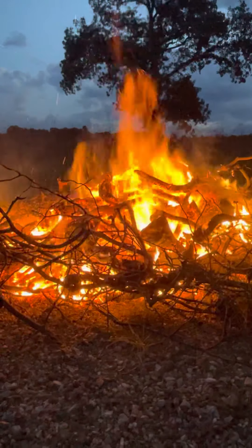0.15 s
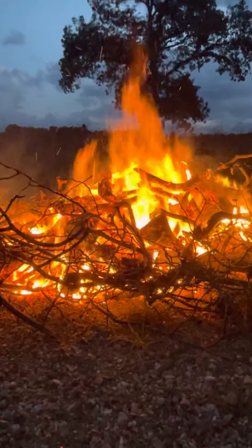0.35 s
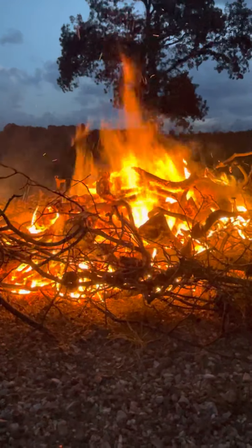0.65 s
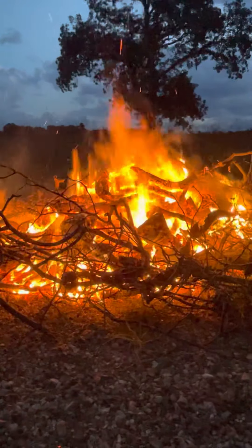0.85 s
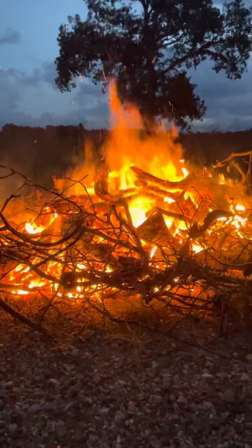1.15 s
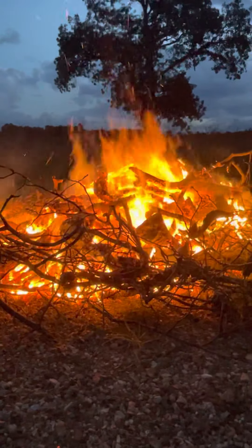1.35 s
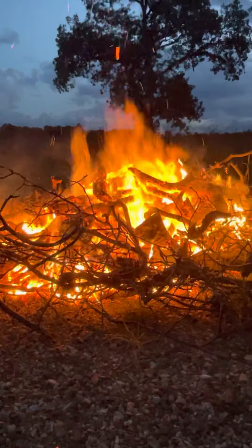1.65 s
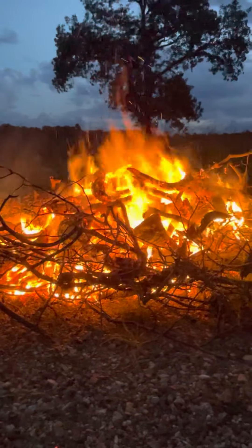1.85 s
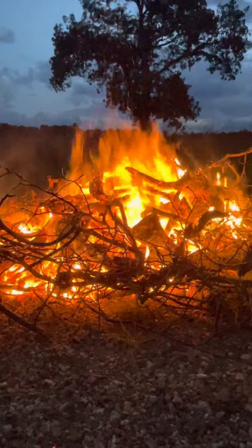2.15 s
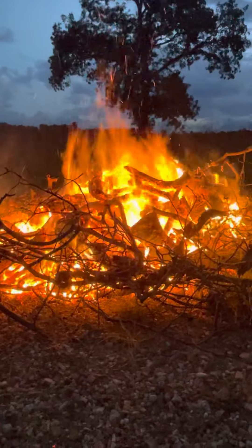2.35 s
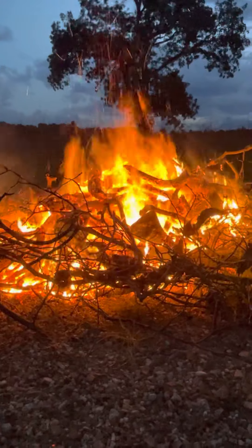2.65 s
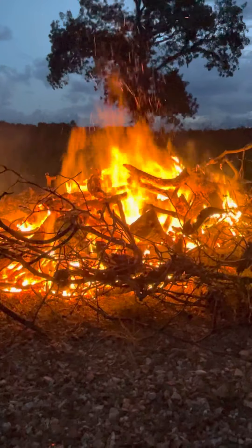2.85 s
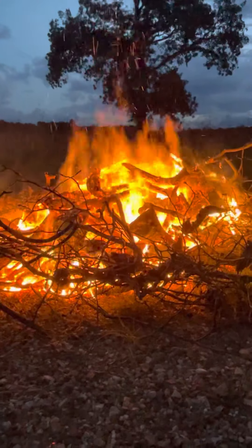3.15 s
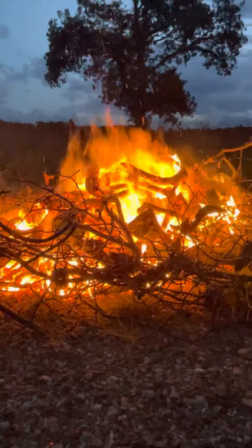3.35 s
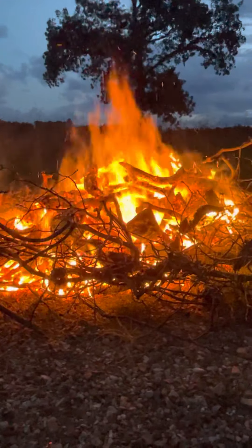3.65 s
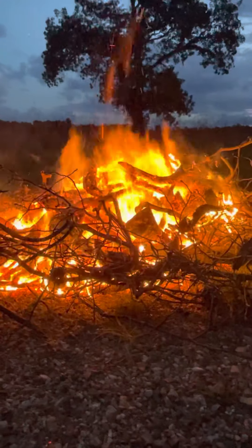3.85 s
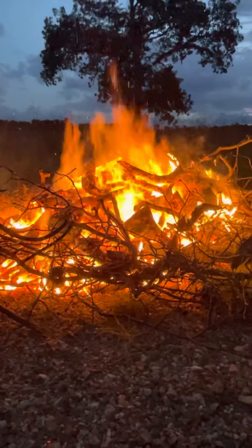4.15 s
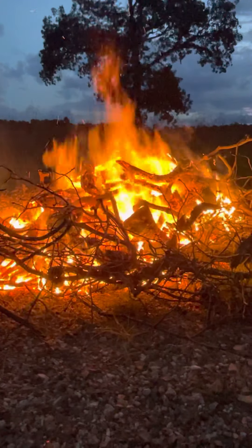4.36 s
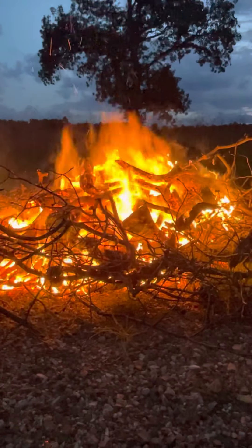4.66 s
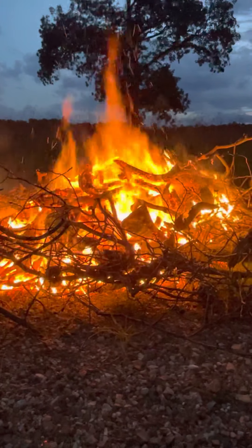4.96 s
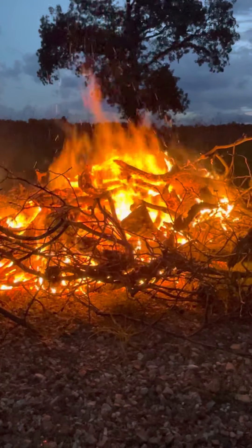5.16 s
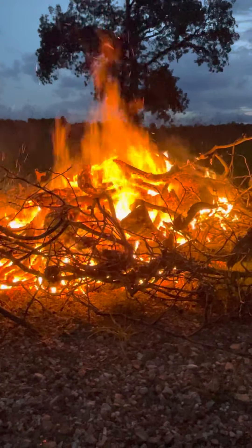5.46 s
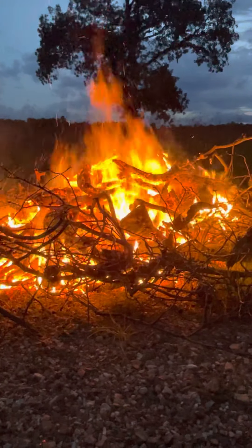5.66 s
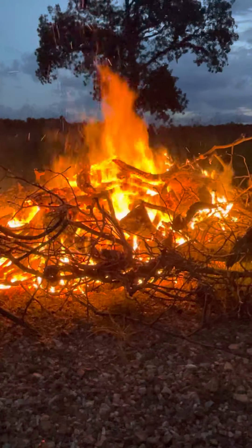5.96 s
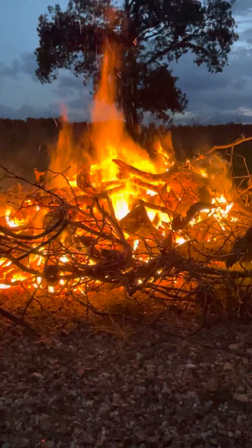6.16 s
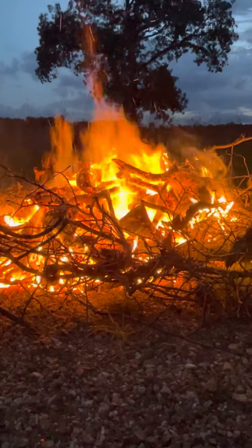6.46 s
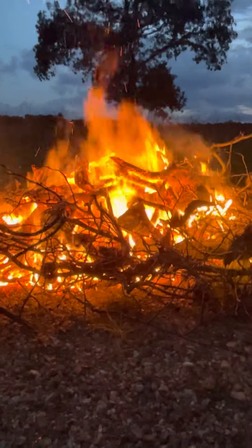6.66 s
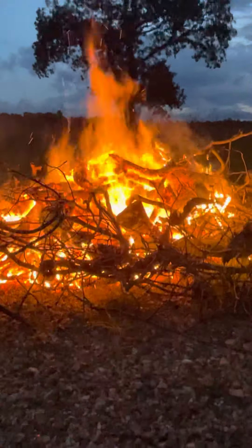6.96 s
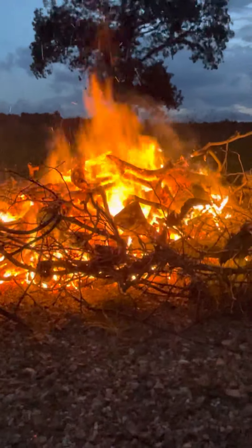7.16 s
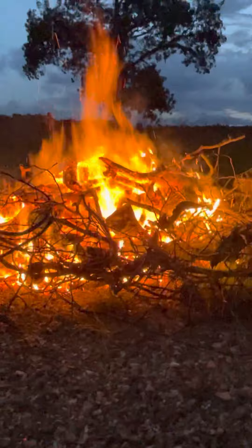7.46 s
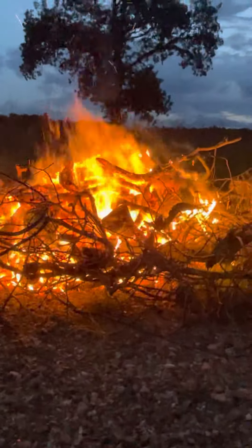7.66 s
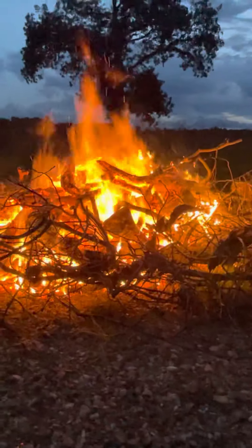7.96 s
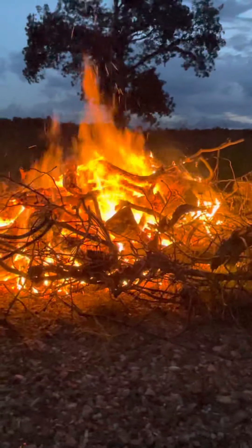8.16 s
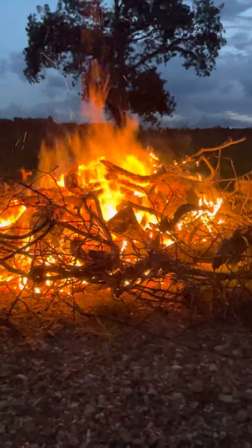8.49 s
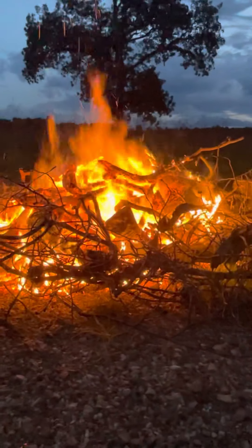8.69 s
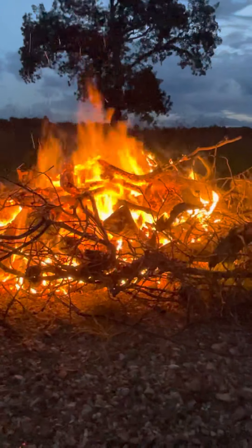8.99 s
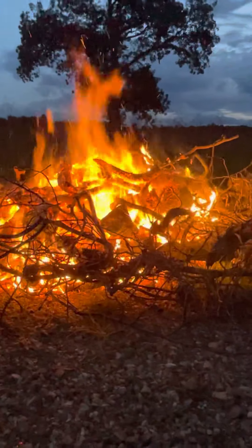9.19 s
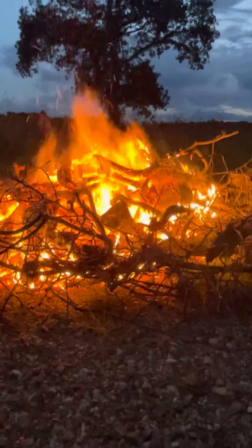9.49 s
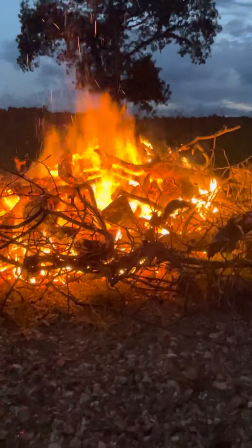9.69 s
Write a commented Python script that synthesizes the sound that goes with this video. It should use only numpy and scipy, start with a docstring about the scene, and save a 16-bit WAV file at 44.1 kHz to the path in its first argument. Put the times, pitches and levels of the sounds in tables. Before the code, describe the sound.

Burning branches pop and crackle close by in the open, growing fiercer toward the end, with faint dusk insects and one distant calf low.

```python
"""A pasture at dusk: a big brush fire burns a few metres ahead, popping and crackling over its rumble and hiss.
Pops and crackles are sharp pulses with scattered noise echoes; the flames are coloured, partly shared noise.
Crickets chirp and trill in the grass as pulsed tones, with distant choruses as throbbing noise bands.
A calf lows once, far to the right, as a few overtones on an arched pitch."""
import sys
import numpy as np
from scipy import signal
from scipy.fft import rfft, irfft, next_fast_len
from scipy.io import wavfile
from scipy.ndimage import uniform_filter1d

SR = 44100
rng = np.random.default_rng(int(sys.argv[2]) if len(sys.argv) > 2 else 0)


def log_audio(samples):
    """Write samples as a 16-bit WAV file to the path given in sys.argv[1]."""
    # one column per channel
    frames = np.atleast_2d(samples).T
    # limit to full scale, then quantise
    limited = np.clip(frames, -1, 1)
    pcm = np.round(limited * 32767).astype(np.int16)
    wavfile.write(sys.argv[1], SR, pcm)


N = 433503
SIZE = next_fast_len(N + 8192)  # transform length, padded so filters do not wrap round
FREQ = np.maximum(np.arange(SIZE // 2 + 1) * SR / SIZE, 1)  # Hz
TIME = np.arange(N) / SR  # s


def undb(db):
    """Gain of a dB value."""
    return 10 ** (np.asarray(db) / 20)


def level(x, db):
    """Set the rms level in dB."""
    return x * undb(db) / np.sqrt(np.mean(x ** 2))


def read(table):
    """Read a (Hz, value) table at every frequency, straight between points on a log axis."""
    hz, value = np.transpose(table)
    return np.interp(np.log(FREQ), np.log(np.maximum(hz, 1)), value)


def shape(x, response):
    """Filter by a frequency response."""
    return irfft(rfft(x, SIZE) * response, SIZE)[..., :N]


def walk(rate):
    """Random drift: values held for 1 / rate seconds, then smoothed twice; spread near 1."""
    hold = int(SR / rate)
    steps = np.repeat(rng.standard_normal(N // hold + 1), hold)
    smooth = uniform_filter1d(uniform_filter1d(steps, hold), hold)
    return 1.71 * smooth[:N]


def pan(db):
    """Left and right gains for a left-minus-right difference in dB."""
    return undb(np.array([[db], [-db]]) / 2)


# Colour of the four parts of a burst. Each row: frequency in Hz, relative gain in dB.
THUD = [(100, -9), (280, -5), (500, 0.5), (1000, -8.5), (2000, -34.5)]
CRACK = [(600, -16.5), (1350, -1), (2400, 5), (3300, -3), (4500, -36)]
SNAP = [(2800, -23.5), (4000, 1), (7500, -5), (10000, -20)]
SIZZLE = [(6500, -19), (9000, 5), (16000, -4.5)]
# echoes off near branches, then off the whole pile
SCATTER_MS, SCATTER_DB, TAIL_MS = 0.33, -8.5, 7.5
RAGGED_DB = 5.5  # spread of the uneven steps in the tail
BURST_SAMPLES = 700


def bursts(events, tail_db):
    """Each pocket of gas bursts as one sharp pulse with scattered echoes; twigs scatter short waves most."""
    seconds, crack_db, thud_db, snap_db, sizzle_db = events.T
    ms = np.arange(BURST_SAMPLES) * 1000 / SR
    chance = rng.standard_normal((len(events), 3 * BURST_SAMPLES + 1))
    stretch = np.exp(.4 * chance[:, -1:])
    shared, left, right = np.split(chance[:, :-1], 3, axis=1)

    ragged = undb(RAGGED_DB * np.repeat(chance[:, :16], 44, axis=1)[:, :BURST_SAMPLES])
    scatter = undb(SCATTER_DB) * np.exp(-ms / SCATTER_MS / stretch)
    tail = undb(tail_db) * ragged * np.exp(-ms / TAIL_MS) * (1 - ms / ms[-1])
    fade = scatter + tail

    start = np.round(seconds[:, None] * SR).astype(int)
    place = (start + np.arange(BURST_SAMPLES)).ravel()
    out = np.zeros((2, N))
    # per part: level, colour, share of echoes, share of those that differ between the ports
    parts = ((thud_db, THUD, .12, .2), (crack_db, CRACK, .18, .2),
             (snap_db, SNAP, 1.1, .6), (sizzle_db, SIZZLE, 1.4, .4))
    for part_db, table, echo, own in parts:
        response = undb(read(table))
        for channel, private in enumerate((left, right)):
            wave = echo * fade * (shared + own * private)
            wave[:, 0] = 1  # the sharp pulse itself
            # the energy of the first half ms sets the level
            wave /= np.sqrt(np.sum(wave[:, :22] ** 2, axis=1, keepdims=True))
            weighted = undb(part_db)[:, None] * wave
            train = np.bincount(place, weighted.ravel(), N + BURST_SAMPLES)
            out[channel] += shape(train[:N], response / response.mean())
    return out


# Loud wood pops.
# Each row: start in seconds, base level in dB, pitch in octaves above 5 kHz, thud level in dB.
POPS = [(0.097, -21.5, 0.054, -60), (0.2255, -13.5, -0.32, -36), (0.2706, -17, 0.43, -52.0),
        (0.491, -22, 0.53, -50.0), (0.6792, -24.5, 0.58, -60), (0.7457, -27.5, -0.26, -36.5),
        (0.9334, -16, 0.014, -59), (0.9672, -20, -0.074, -58), (1.4362, -28, 0.11, -57),
        (1.461, -15.5, 0.57, -62), (1.465, -19.5, 0.41, -53), (1.9568, -25.5, 0.089, -51),
        (2.0176, -37, -0.85, -32), (2.0707, -19.5, 0.088, -60), (2.0858, -12.5, 0.037, -64),
        (2.1582, -16.5, -0.15, -55), (2.2022, -20, -0.47, -37), (2.2146, -25, 0.42, -55),
        (2.2327, -17.5, 0.027, -40), (2.3014, -48, -0.15, -30), (2.356, -21.5, 0.45, -40),
        (2.433, -20, 0.44, -25.5), (2.57, -31, 0.77, -62), (2.6215, -7, 0.49, -49),
        (2.7454, -25.5, 0.28, -52), (2.833, -18, 0.42, -49), (2.852, -23.5, 0.32, -54),
        (2.992, -21, 0.54, -57), (3.016, -18, 0.73, -58), (3.2109, -18.5, -0.12, -30.5),
        (3.214, -20.5, -0.038, -35), (4.3366, -17, -0.63, -51), (4.4227, -24.5, 0.24, -44),
        (4.599, -21, 0.4, -67), (4.7138, -17.5, 0.59, -56.5), (4.7265, -22, 0.55, -55),
        (4.77, -24, 0.3, -56), (4.8052, -17.5, 0.059, -53), (5.038, -23, 0.33, -50),
        (5.354, -21, 0.39, -49), (5.507, -30, -0.67, -50), (5.595, -49, -0.45, -34),
        (5.724, -24, 0.26, -47), (6.1907, -0.5, -0.53, -16.5), (6.275, -23.5, 0.65, -54.5),
        (6.288, -25, 0.26, -52), (6.359, -18, -0.46, -21.5), (6.782, -25, -0.088, -39),
        (6.821, -16.5, 0.49, -51), (6.943, -19.5, 0.22, -55), (6.947, -12, 0.92, -60),
        (6.9605, -18.5, 0.12, -56), (7.02, -21, 0.5, -41), (7.1037, -25.5, -0.64, -39),
        (7.2142, -34, -0.78, -50), (7.3675, -22, 0.35, -41), (7.6203, -21.5, 0.68, -55),
        (7.7744, -20, -0.24, -47), (7.991, -5, 0.46, -32), (8.1748, -15.5, 0.62, -46),
        (8.194, -5.5, -0.57, -11.5), (8.212, -19, 0.67, -31), (8.2171, -6, 0.73, -26),
        (8.2688, -24, 0.24, -46), (8.292, -27, 0.26, -30.5), (8.584, -17.5, 0.52, -36.5),
        (8.6646, -16.5, 0.76, -37), (8.683, -10, -0.094, -37), (8.7332, -3.5, 0.35, -21.5),
        (8.7372, -9.5, 0.45, -52), (8.7846, -21.5, 0.16, -39), (8.857, -22, -0.45, -30.5),
        (8.9347, -21.5, 0.93, -56), (9.136, -22, 0.5, -56.5), (9.1558, -17.5, 0.53, -53),
        (9.185, -18, -0.036, -41), (9.215, -18.5, -0.3, -34), (9.2302, -19.5, 0.67, -53),
        (9.3925, -5.5, -0.12, -26), (9.492, -21.5, 0.19, -55), (9.517, -16, 0.41, -48),
        (9.6775, -20, 0.34, -47), (9.7468, -23.5, -0.33, -40), (9.8098, -21.5, 0.012, -42)]
# Own pitch of crack, snap and sizzle. Each entry: octaves above 5 kHz.
PART_OCTAVES = np.array([-1.2, 0, 1])
# Gain of crack, snap and sizzle at their own pitch. Each entry: dB over the base level.
PART_DB = [4, 1.5, 4]
FALL_DB_PER_OCTAVE = 11.5  # loss as the pop's pitch moves away from a part's own
POP_TAIL_DB = -21


def pops():
    """A big pocket cracks low, a small one sizzles high; thick wood adds a thud."""
    seconds, base_db, pitch, thud_db = np.transpose(POPS)
    octaves_away = np.abs(PART_OCTAVES - pitch[:, None])
    part_db = base_db[:, None] + PART_DB - FALL_DB_PER_OCTAVE * octaves_away
    crack, snap, sizzle = part_db.T
    return bursts(np.c_[seconds, crack, thud_db, snap, sizzle], POP_TAIL_DB)


CRACKLE_PER_S = 150  # average rate
# quietest size before flurries, scale of the random rise above it, and size limit before colour
CRACKLE_DB, CRACKLE_SPREAD_DB, CRACKLE_CAP_DB = -51.5, 6, -36


def crackle(clumping=1.6, flurry_db=3.5, flurry_s=0.2):
    """Small bursts in uneven flurries: many faint, few loud, each with its own colour."""
    chance = rng.random((4000, 6))
    gaps = (-np.log(1 - chance[:, 0])) ** clumping
    seconds = np.cumsum(gaps) / gaps.mean() / CRACKLE_PER_S
    # wood that pops loudly also crackles harder around those moments
    from_pops = np.abs(seconds[:, None] - np.array(POPS)[:, 0])
    busy = np.log1p(np.exp(-from_pops / flurry_s).sum(axis=1))
    rise_db = -CRACKLE_SPREAD_DB * np.log(1 - chance[:, 1])
    size_db = np.minimum(CRACKLE_DB + flurry_db * busy + rise_db, CRACKLE_CAP_DB)
    # crack, thud, snap, sizzle: middle level and reach either side, in dB
    middle_db, reach_db = np.array([-13.0, -23.5, -3.0, 1.0]), np.array([9.4, 12.8, 10.5, 7.4])
    colour_db = middle_db + reach_db * (2 * chance[:, 2:] - 1)
    events = np.c_[seconds, size_db[:, None] + colour_db]
    return bursts(events[seconds < N / SR], -23)  # small bursts are dry


# Noise that the ports do not share. Each row: frequency in Hz, level in dB against the shared noise.
APART = [(60, -31), (200, -26), (600, -5.5), (1500, -10.5), (3000, -34), (7000, -31)]


def noise_pair(table):
    """Coloured noise: a part shared by both ports and a part of opposite sign in each."""
    mid, side = rfft(rng.standard_normal((2, N)), SIZE)
    pair = mid + undb(read(APART)) * side * np.array([[1], [-1]])
    return irfft(pair * undb(read(table)), SIZE)[:, :N]


# Spectra of the flames. Each row: frequency in Hz, relative density in dB per Hz.
RUMBLE = [(15, -40), (42, -7), (69, 0.5), (210, -14), (400, -24), (650, -34), (1500, -43.5), (3000, -84)]
HISS = [(500, -13.5), (1200, -4), (2500, 2), (5000, 3.5), (9000, -1.5), (15700, -0.5), (16100, -30)]
RUMBLE_DB, HISS_DB = -45, -57.5  # rms; the hiss before its flutter


def flames():
    """Turbulent burning rumbles; escaping gas hisses and flutters."""
    rumble = level(noise_pair(RUMBLE), RUMBLE_DB)
    flutter = undb(2.17 * walk(40))
    hiss = level(noise_pair(HISS), HISS_DB) * flutter
    return rumble + hiss


# Chirps of one cricket, then of a second elsewhere in the grass.
# Each entry: middle of the last pulse in seconds.
CHIRPS = [.378, 1.745, 2.317, 2.811, 3.301, 3.79, 4.316, 4.901, 5.412, 6.002, 6.491, 7.43, 9.815]
FAR_CHIRPS = [1.251, 4.63, 6.093, 6.932, 7.468, 8.014, 8.977, 9.286]
# Pulses of a chirp, last stroke first. Each entry: relative level in dB.
CHIRP_PULSE_DB = [0, 0, -5]
CHIRP_DB, FAR_CHIRP_DB = -53.5, -53.5  # stroke peak, before the waver
CHIRP_HZ, CHIRP_PULSE_S, CHIRP_GAP_S = 4385, .025, .044  # the gap runs from pulse to pulse


def chirps(times, db, lead, sag_hz=150):
    """One wing stroke per pulse, the first one weak, its pitch sagging; lead = radians the left leads."""
    out = np.zeros((2, N + SR))
    u = np.arange(int(CHIRP_PULSE_S * SR)) / SR
    hz = CHIRP_HZ + sag_hz * (.5 - u / CHIRP_PULSE_S)
    phase = 2 * np.pi * np.cumsum(hz) / SR
    envelope = np.sqrt(np.sin(np.pi * u / CHIRP_PULSE_S))
    stroke = envelope * np.sin(phase + np.array([[lead], [0]]))
    waver_db = 1.5 * walk(90)
    for last in times:
        for k, pulse_db in enumerate(CHIRP_PULSE_DB):
            i = int((last - k * CHIRP_GAP_S - CHIRP_PULSE_S / 2) * SR)
            out[:, i:i + len(u)] += undb(db + pulse_db) * stroke
    return out[:, :N] * undb(waver_db)


TRILL_HZ, TRILL_SAG_HZ, TRILL_PER_S = 3710, 60, 53.5  # centre pitch, swing either side, strokes
TRILL_DB = -69  # rms before panning


def tree_cricket():
    """One nearer insect: even wing strokes, each a short tone that sags, blurred by the leaves between."""
    turn = 2 * np.pi * TRILL_PER_S * TIME + walk(2)
    hz = TRILL_HZ + TRILL_SAG_HZ * np.sin(turn) + 70 * walk(200)
    strokes = 1.5 - np.cos(turn)
    waver = undb(walk(2) + 1.5 * walk(100))
    tone = np.sin(2 * np.pi * np.cumsum(hz) / SR) * strokes * waver
    return level(tone, TRILL_DB) * pan(-6)


# Overtones of the calf's voice. Each row: multiple of the pitch, relative level in dB.
CALF_ORDERS = [(4, -12), (5, -6), (6, 0), (7, -8)]
CALF_START_S, CALF_ATTACK_S, CALF_HOLD_S, CALF_RELEASE_S = 2.5, .4, .18, .27
# rms of the strongest overtone while held, before pan and waver; depth of the swell and fade
CALF_DB, CALF_FADE_DB = -68.5, 16
CALF_TOP_HZ, CALF_TOP_S, CALF_ARCH_HZ_PER_S2 = 198, 3.0, 98  # top of the pitch arch, before waver
CALF_PAN_DB = -19  # left minus right


def calf(waver=0.0015):
    """A smooth low on an arched pitch; only the overtones near the mouth resonance carry this far."""
    hz = np.maximum(CALF_TOP_HZ - CALF_ARCH_HZ_PER_S2 * (TIME - CALF_TOP_S) ** 2, 0)
    phase = 2 * np.pi * np.cumsum(hz * (1 + waver * walk(8))) / SR
    voice = sum(undb(db) * np.sin(round(order) * phase) for order, db in CALF_ORDERS)
    corners = np.cumsum([CALF_START_S, CALF_ATTACK_S, CALF_HOLD_S, CALF_RELEASE_S])
    # far below hearing outside the low
    db = CALF_DB + CALF_FADE_DB * np.interp(TIME, corners, [-1, 0, 0, -1], -10, -10)
    return np.sqrt(2) * voice * undb(db) * pan(CALF_PAN_DB) * undb(walk(18))


# Steady insect choruses. Each row: centre in Hz, half-width in Hz, pulses per second, throb depth 0-1,
# rms level in dB before pan and swell, left minus right in dB.
TRILLS = [(2730, 400, 39, 0.24, -65.5, 4), (4330, 820, 38, 0.27, -68, 7.5)]


def trills(own=0.93):
    """Choruses of distant insects: narrow bands that throb at the wing rate."""
    out = 0
    for hz, width, rate, depth, db, pan_db in TRILLS:
        shared, *private = rng.standard_normal((3, N))
        response = np.exp(-2 * ((FREQ - hz) / width) ** 2)
        band = shape(shared + own * np.array(private), response)
        throb = 1 + depth * np.sin(2 * np.pi * rate * TIME + 0.67 * walk(2.16))
        swell = undb(.7 * walk(5))
        out = out + level(band * throb, db) * pan(pan_db) * swell
    return out


# The two microphone ports facing the fire. Each row: frequency in Hz, phase lead of the left in radians.
PORTS = [(100, 0), (2580, -0.9), (3880, 2.5), (4650, 3), (5400, 1), (7000, 2), (9900, 5.5), (12100, 7),
         (13700, 9), (16400, 11)]
# Balance of the fire. Each row: frequency in Hz, left minus right in dB.
LEAN = [(150, 0), (800, 2.5), (1500, 2), (2600, -2.5), (6000, -0.5)]


def scene():
    """Fire ahead through the two ports, animals from their own sides."""
    fire = pops() + crackle() + flames()
    side = np.array([[.5], [-.5]])  # half of each difference per port
    fire = shape(fire, undb(side * read(LEAN)) * np.exp(1j * side * read(PORTS)))
    crickets = chirps(CHIRPS, CHIRP_DB, 1.55) + chirps(FAR_CHIRPS, FAR_CHIRP_DB, 3.0)
    return fire + crickets + trills() + tree_cricket() + calf()


# Microphone colour. Each row: frequency in Hz, gain in dB.
MIC = [(5000, 0), (8500, -4.5), (10600, 1), (13000, -4), (15500, 1.5), (17000, -28)]
# below LATE_HZ a tone is delayed by LATE_CYCLES of its own period, less that of LATE_HZ
LATE_CYCLES, LATE_HZ = 1.302, 2480
TOP_HZ = 16600


def record(dry):
    """Microphone colour, lows that arrive late, and the cut at the top."""
    ratio = np.minimum(FREQ, LATE_HZ) / LATE_HZ
    late = np.exp(2j * np.pi * LATE_CYCLES * (ratio - 1 - np.log(ratio)))
    coloured = shape(dry, late * undb(read(MIC)))
    top_cut = signal.ellip(10, .2, 70, TOP_HZ, fs=SR, output="sos")
    return signal.sosfilt(top_cut, coloured)


dry = scene()
out = record(dry)
log_audio(out)
```